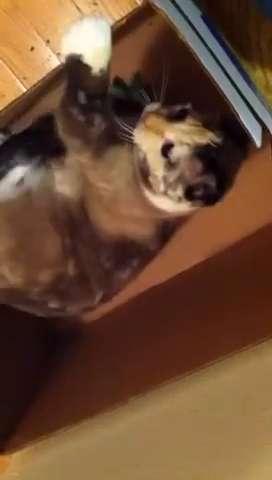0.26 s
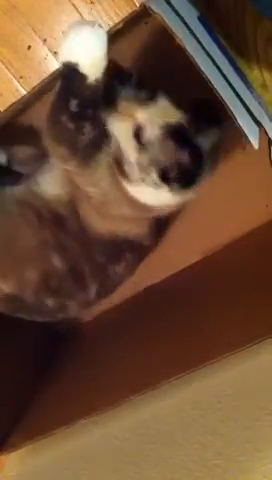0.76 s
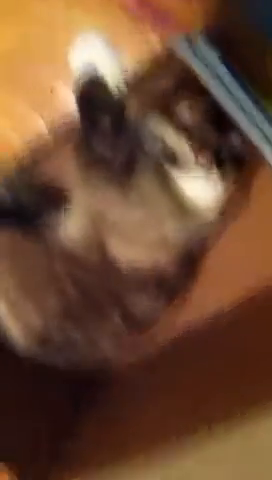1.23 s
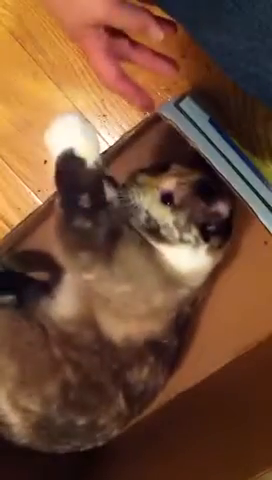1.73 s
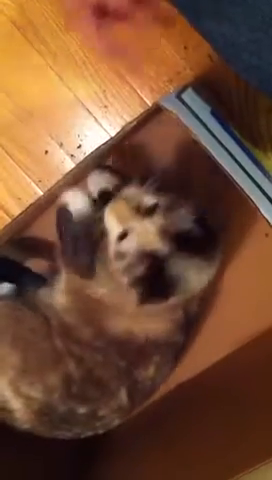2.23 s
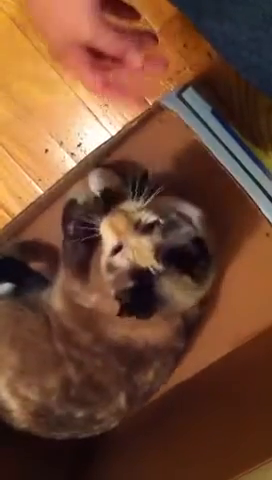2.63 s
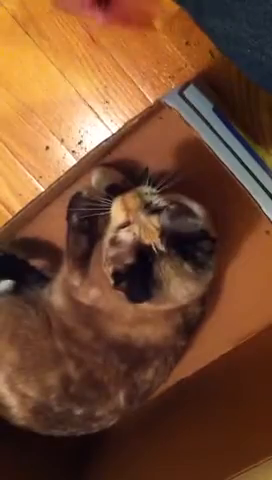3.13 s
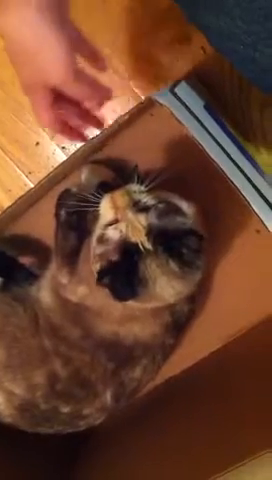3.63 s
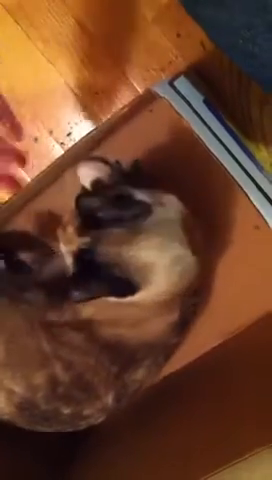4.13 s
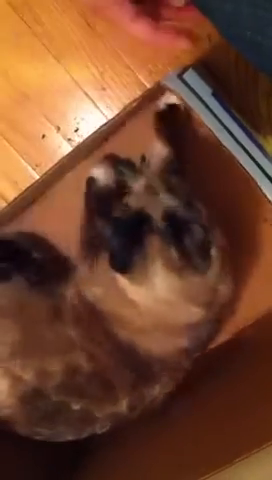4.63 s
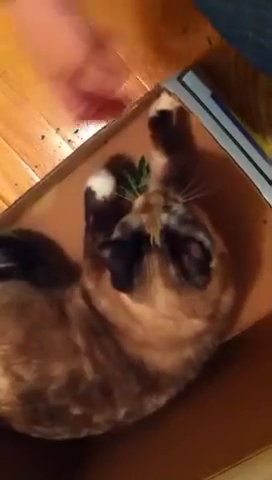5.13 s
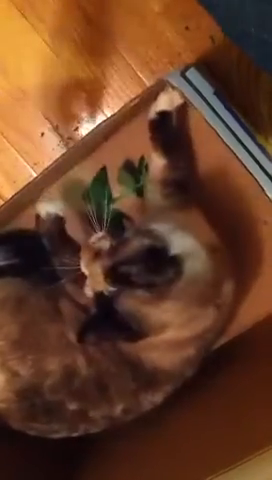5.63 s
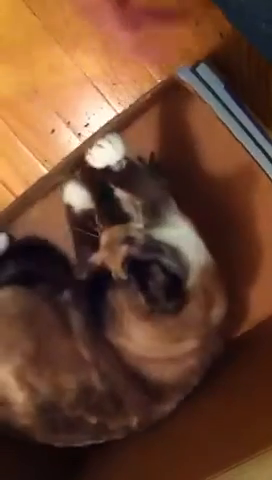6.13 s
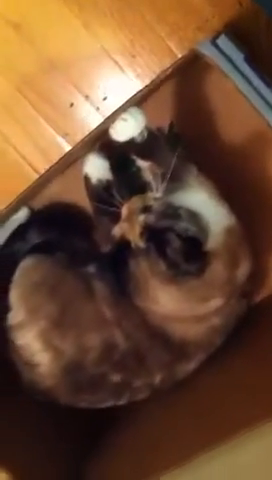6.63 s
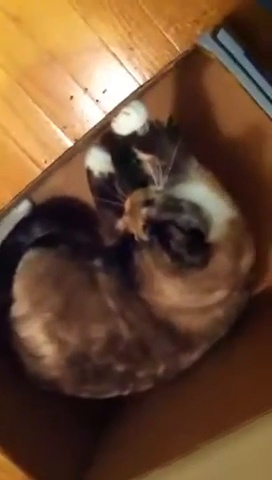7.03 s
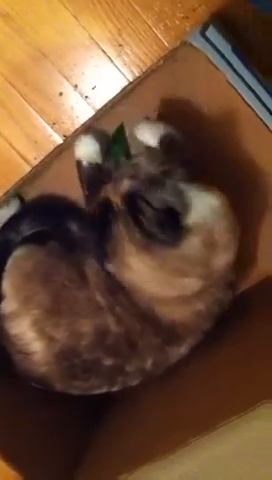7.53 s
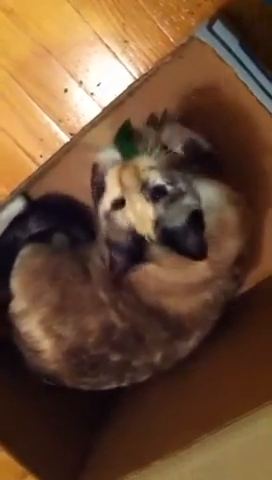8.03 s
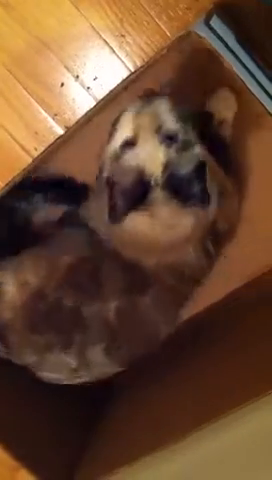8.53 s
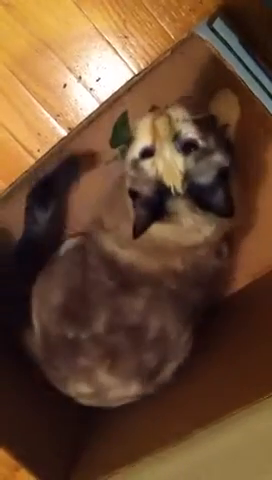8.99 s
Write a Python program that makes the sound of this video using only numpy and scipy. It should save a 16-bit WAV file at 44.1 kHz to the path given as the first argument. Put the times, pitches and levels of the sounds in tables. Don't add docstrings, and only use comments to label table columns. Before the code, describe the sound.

Close to an open cardboard box in a quiet room, a cat's paws knock and scuff the board, with one deep, boomy thump early on. Scratchy dragging bursts follow as the body rolls, peaking in a loud, sharp crack and scrape. Afterwards only faint fur rustles and tiny claw ticks remain over low room tone and soft hiss.

```python
import sys
import numpy as np
from scipy import signal
from scipy.io import wavfile
from scipy.ndimage import uniform_filter1d

SR = 44100
rng = np.random.default_rng(int(sys.argv[2]) if len(sys.argv) > 2 else 0)


def log_audio(samples):
    frames = np.atleast_2d(samples).T
    limited = np.clip(frames, -1, 1)
    pcm = np.round(limited * 32767).astype(np.int16)
    wavfile.write(sys.argv[1], SR, pcm)


def level_to_linear(level):
    exponent = np.asarray(level, float) / 20
    return 10 ** exponent


N = 408366


def rms_one(x):
    return x / np.sqrt(np.mean(x ** 2) + 1e-20)


def drift(rate):
    r = np.exp(-80 * np.pi * rate / SR)
    noise = rng.standard_normal(N // 40 + 2002)
    slow = signal.lfilter([1], [1, -2 * r, r * r], noise)[2000:]
    return np.interp(np.arange(N) / 40, np.arange(len(slow)), rms_one(slow))


# [pitch_hz, level_db per Hz]
RUMBLE = [(20, -15.5), (60, -43), (85, -12), (115, -15.5), (155, 3), (200, -7), (310, -9), (500, -12),
          (650, -17.5)]
# [pitch_hz, level_db per Hz]
HISS = [(1000, -20), (2500, -23), (4000, -25), (5000, -30), (6500, -28), (10000, -38), (13000, -45),
        (15500, -54)]
# [pitch_hz, level_db rms]
WHINE = [(14998, -96)]
FLOOR_DB = -63


def room_tone():
    out = 0
    edges = 20 * 2 ** (np.arange(30) / 3)
    white = rng.standard_normal((2, N))
    hz, db = np.transpose(RUMBLE + HISS)
    for k, (low, high) in enumerate(zip(edges, edges[1:])):
        third = signal.butter(3, [low, high], "band", fs=SR, output="sos")
        band = signal.sosfilt(third, white[k % 2])
        level_db = np.interp(np.log(low * high) / 2, np.log(hz), db)
        out = out + level_to_linear(level_db + .8 * drift(3)) * band
    whine = sum(level_to_linear(db + 3) * np.sin(2 * np.pi * hz * np.arange(N) / SR) for hz, db in WHINE)
    return level_to_linear(FLOOR_DB) * rms_one(out) + whine


def resonance(x, hz, width):
    r = np.exp(-np.pi * width / SR)
    top = np.array([1, 0, -1]) * (1 - r * r) / 2
    return signal.lfilter(top, [1, -2 * r * np.cos(2 * np.pi * hz / SR), r * r], x + 1e-18)


def as_bands(modes):
    return [(hz, np.log(1000) / np.pi / t60, db) for hz, db, t60 in modes]


# [pitch_hz, level_db, t60_s]
BOOM = [(154.2, -1, 0.38), (186.7, -9, 0.12)]
# [pitch_hz, level_db, t60_s]
PANELS = [(243.5, -7.5, 0.033), (304, -1.5, 0.068), (316, -4.5, 0.058), (358, -9.5, 0.052), (411.8, 6, 0.2),
          (467.6, -2.5, 0.17), (495, -20, 0.55), (591, -8, 0.032)]
# [pitch_hz, width_hz, level_db]
FACE = [(830, 160, -3), (892, 47, -3), (1079, 166, 1.5), (1226, 60, 2), (1328, 63, -2), (1510, 236, -8.5),
        (1667, 107, -1)]
# [pitch_hz, width_hz, level_db]
RIDGES = [(2017, 270, 1), (2304, 160, 0), (2588, 180, -3), (2987, 326, -1.5), (3300, 200, -6.5),
          (3630, 200, -2.5), (3860, 430, -8.5), (4260, 360, -11)]
# [pitch_hz, width_hz, level_db]
FIZZ = [(5136, 1770, 10), (5900, 600, -12), (6380, 1100, 15.5), (7800, 1020, 11.5), (8435, 1100, -2.5),
        (11300, 2100, -6), (12870, 1200, -13), (13630, 1200, -23.5)]
BODIES = (as_bands(BOOM), as_bands(PANELS), FACE, RIDGES, FIZZ)


def rubbed(body, force, patchy_db):
    ring = sum(level_to_linear(db + patchy_db * drift(10.0)) * resonance(force * rng.choice([-1, 1], N), hz, width)
               for hz, width, db in body)
    reach = [.85 * body[0][0], 1.07 * body[-1][0]]
    return rms_one(signal.sosfilt(signal.butter(4, reach, "band", fs=SR, output="sos"), ring))


def slips(per_s, spread_db, clump_db):
    born = rng.random(N) < per_s / SR
    sizes = level_to_linear(spread_db * np.minimum(rng.exponential(1, N), 3.0)) * rng.choice([-1, 1], N)
    return born * sizes * level_to_linear(clump_db * (drift(32) + 0.36 * drift(140)))


STREAKS_DB, STREAK_WIDTH_HZ, STREAK_PATCHY_DB = -12, 18.3, 8


def streaks(force):
    out = 0
    for hz in np.geomspace(800, 4200, num=14) * rng.uniform(.95, 1.05, size=14):
        level_db = STREAK_PATCHY_DB * drift(6.9) - 8.1 * np.log2(hz / 1000)
        out = out + level_to_linear(level_db) * resonance(force, hz, STREAK_WIDTH_HZ * np.sqrt(hz / 1000))
    return rms_one(out)


# [peak_s, extra_db, length_ms]
CATCHES = [(3.67, 2, 34), (3.756, 4, 72), (3.898, 7, 63), (3.934, 8, 33), (4.012, 10, 37), (4.09, 8, 43),
           (4.143, 7.5, 39), (4.21, 10, 26), (4.26, 10.5, 56), (4.309, 8.5, 65), (4.354, 2.5, 31),
           (4.413, 8, 40), (4.605, 8.5, 11), (4.631, 4, 69), (4.699, 1, 21), (5.097, 5, 93), (5.189, 1, 27),
           (5.326, -2.5, 41), (5.397, 3.5, 72), (5.447, 1.5, 28), (5.78, 3, 26), (5.752, 5.5, 25),
           (5.878, 10.5, 33), (5.918, 4.5, 19), (5.965, 2, 53), (6.07, 0.5, 28), (6.103, 5.5, 28)]


def catching():
    extra_db, t = np.zeros(N), np.arange(N) / SR
    for s, bump_db, length_ms in CATCHES:
        near = slice(round((s - .15) * SR), round((s + .15) * SR))
        extra_db[near] += bump_db * np.exp(-((t[near] - s) * 3500 / length_ms) ** 2)
    return level_to_linear(extra_db)


def strokes(rows):
    out = np.zeros((4, N))
    for start, end, rise_s, fall_s, *parts_db in rows:
        rise_s, fall_s = max(rise_s, .002), max(fall_s, .002)
        first = max(round((start - 2.5 * rise_s) * SR), 0)
        last = min(round((end + 2.5 * fall_s) * SR), N)
        near = np.arange(first, last)
        rise, fall = (near / SR - start) / rise_s, (end - near / SR) / fall_s
        shape = level_to_linear(20 * np.minimum(np.minimum(rise, fall), 0))
        out[:, near] += np.outer(level_to_linear(np.array(parts_db)), shape)
    return out


FIZZ_UNDER_DB, FIZZ_FOLLOWS = -12, 0.89


def pressed(face_db, panel_db, ridge_db):
    return face_db + np.array([panel_db, 0, ridge_db, FIZZ_UNDER_DB + FIZZ_FOLLOWS * ridge_db])


# [start_s, end_s, face_db, panels_over_face_db, ridges_over_face_db]
DRAGS = [(3.661, 3.752, -54, 8.5, -3), (3.773, 3.975, -44.5, 1, -7), (4.058, 4.164, -56, 4.5, -2),
         (4.199, 4.445, -43, -1.5, -6.5), (4.5, 4.693, -50, -5.5, -5), (5.097, 5.13, -66.5, 4, 6),
         (5.15, 5.194, -51.5, 0.5, -4), (5.296, 5.432, -47, -1, -7.5), (5.533, 5.567, -53, 2, -10.5),
         (5.712, 5.746, -47, -6, -9.5), (5.781, 5.824, -39, -14, -3), (5.878, 5.98, -36, -1.5, -3),
         (6.068, 6.092, -39.5, -2, 0), (5.988, 6.048, -43, -13.5, -9), (6.142, 6.213, -59, -10.5, -10)]
# [start_s, face_db, fall_s (20 dB), panels_over_face_db, ridges_over_face_db]
SCUFFS = [(0.822, -43, 0.05, 4, -5.5), (0.912, -47.5, -0.12, 5, -6), (0.943, -45, -0.07, -1, -13),
          (1.134, -56, 0.1, -9, -28), (1.241, -44, -0.03, 7, -20), (1.523, -54.5, 0.12, -15, -21),
          (1.759, -54, 0.16, 5, -5.5), (1.84, -36, 0.04, 7, -12), (2.042, -27.5, 0.0183, 8, -13),
          (2.07, -56, 0.25, 0, -9), (2.425, -38, 0.0166, -11, -1.5), (2.556, -42, 0.06, 1, -2),
          (3.314, -43.5, .04, 2.5, -19), (3.385, -52, 0.1, 3, -8), (3.44, -51, 0.1, 7, -6),
          (3.514, -51, .03, 7, -15.5), (3.578, -53.5, 0.1, 6, -2), (4.461, -24.5, 0.0378, -11.5, -8),
          (4.858, -61, -0.03, 6, -2), (5.81, -34.5, 0.0353, -4.5, -0.5), (5.841, -20.5, 0.0177, -7, -8),
          (0.592, -47, .07, 4, -5), (1.594, -42, .04, -6, -1)]
# [peak_s, face_db, swell_s (20 dB), panels_over_face_db, ridges_over_face_db]
PRESSES = [(1.36, -71, -0.3, -7, -3), (1.463, -59, 0.13, 6.5, -3), (1.75, -70, -0.26, 14, -4),
           (2.032, -47.5, 0.0939, 4.5, -9.5), (2.28, -69, 0.1, 0, -4), (2.72, -65.5, 0.2, -1, -18),
           (2.89, -64, .12, -25, -22), (4.99, -63, 0.27, 2.5, -19), (6.4, -68, -0.74, -9, -2),
           (5.69, -46.5, 0.03, -9, -12), (0.99, -59.5, 0.1, 14, -18), (2.472, -43.5, 0.02, -7, -5),
           (2.6, -45, 0.0455, -9, -1), (1.79, -59.5, .04, 0, -8), (2.11, -59, 0.13, 6, -14),
           (0.637, -50, .035, 3, -8), (1.615, -45, .045, -8, 0), (3.405, -47, .03, 0, -6),
           (3.465, -50, .025, 4, -4)]
# [start_s, end_s, face_db,
# ridges_over_face_db, fizz_over_face_db]
BRUSHES = [(0.925, 0.951, -50.5, 0.5, 1.5), (1.98, 2.037, -89, -7, 17), (3.136, 3.16, -78, 13.5, 5),
           (5.058, 5.103, -80, 13, 18.5), (5.122, 5.19, -64.5, -1, 4.5), (5.276, 5.36, -65, 7.5, 8),
           (6.896, 6.933, -65.5, -3, -6), (7.334, 7.46, -78, 13, 7.5), (7.496, 7.571, -73, 8, 11.5),
           (7.878, 7.919, -69.5, -3.5, -11), (8.03, 8.062, -77, 4.5, -10.5), (8.09, 8.099, -68, 1.5, 7),
           (8.245, 8.311, -82, 5, 7), (8.389, 8.405, -70.5, -14, -2), (8.559, 8.597, -83.5, 9.5, 15),
           (8.668, 8.674, -63.5, 8, 8), (8.8, 8.805, -71, 4, -2), (8.834, 8.93, -68.5, -3, -5),
           (9.084, 9.128, -83, -10, 8), (9.132, 9.185, -75, 2.5, -1), (9.184, 9.248, -76, -1, -5)]
DRAG_RISE_S, DRAG_FALL_S = 0.074, 0.049
BRUSH_RISE_S, BRUSH_FALL_S = 0.1, 0.027
SCUFF_RISE_S = .003
BOOM_UNDER_DB, WEIGHT_S = -12, 0.081
PANELS_CATCH = 0.81


def rubbing():
    force = slips(per_s=6000, spread_db=3.5, clump_db=2.0)
    drags = strokes([(a, b, DRAG_RISE_S, DRAG_FALL_S, *pressed(*db)) for a, b, *db in DRAGS])
    scuffs = [(s, s, SCUFF_RISE_S, fall_s, *pressed(db, *over)) for s, db, fall_s, *over in SCUFFS]
    presses = [(s, s, swell_s, swell_s, *pressed(db, *over)) for s, db, swell_s, *over in PRESSES]
    brushes = [(a, b, BRUSH_RISE_S, BRUSH_FALL_S, db - 4, db, db + ridge_db, db + fizz_db)
               for a, b, db, ridge_db, fizz_db in BRUSHES]
    light = strokes(scuffs + presses + brushes)
    weight = level_to_linear(BOOM_UNDER_DB) * uniform_filter1d(drags[0] + 0.72 * light[0], round(WEIGHT_S * SR))
    caught = drags * catching() ** np.array([[PANELS_CATCH], [1], [1], [1]])
    levels = np.vstack([weight, caught + light])
    patchy_db = (1.5, 2, 3, 3.5, 4.5)
    trim_db = (1.5, -5.0, -6.5, -3.0, -7.5)
    body_sound = sum(gain * level_to_linear(trim) * rubbed(body, force, patchy)
                     for gain, trim, body, patchy in zip(levels, trim_db, BODIES, patchy_db))
    fine = level_to_linear(STREAKS_DB) * levels[2] * streaks(force)
    fur_top = signal.butter(8, 14200, fs=SR, output="sos")
    return signal.sosfilt(fur_top, body_sound + fine)


# [start_s, peak_db, pitch_hz at first, decay_ms]
DENTS = [(0.593, -29.5, 352, 3.5), (0.938, -20, 361, 7.5), (1.24, -42.5, 302, 3.1), (1.259, -47, 234, 7.6),
         (1.297, -39, 253, 5.6), (1.328, -53, 180, 5), (1.522, -35.5, 262, 2.7), (1.757, -43, 231, 5.3),
         (1.839, -39, 355, 4.4), (1.851, -48, 380, 8.2), (2.423, -39, 254, 3.5), (2.556, -32.5, 305, 4.3),
         (3.314, -27.5, 291, 3.8), (3.512, -50, 220, 4.4), (6.312, -39.5, 405, 0.63)]
DENT_SAG, DENT_SAG_S, DENT_RISE_S = 0.478, 0.01, 0.00052


def dents():
    out, t = np.zeros(N + SR), np.arange(SR // 10) / SR
    turns = (1 - DENT_SAG) * t + DENT_SAG * DENT_SAG_S * (1 - np.exp(-t / DENT_SAG_S))
    for s, db, hz, decay_ms in DENTS:
        swell = (1 - np.exp(-t / DENT_RISE_S)) * np.exp(-1000 * t / max(decay_ms, 1))
        tap = swell * np.sin(-2 * np.pi * hz * turns)
        out[round(s * SR):][:len(t)] += level_to_linear(db) * tap / np.abs(tap).max()
    return out[:N]


def strike(force, body, level_db, lean_db=0):
    luck_db = rng.normal(0, 1.8, len(body)) + lean_db
    ring = sum((-1) ** k * level_to_linear(db + luck_db[k]) * np.sqrt(width) * resonance(force, hz, width)
               for k, (hz, width, db) in enumerate(body))
    return level_to_linear(level_db) * ring / np.abs(ring).max()


def contact(t, contact_ms, top_hz):
    crackle = rng.standard_normal(len(t)) * np.exp(-1000 * t / max(contact_ms, .1))
    crackle[0] = 4.5
    return signal.sosfilt(signal.butter(2, top_hz, fs=SR, output="sos"), crackle)


# [start_s, face_db peak, boom_db, panels_db, fizz_db]
KNOCKS = [(0.594, -45, -50, -43, -40), (0.818, -55, -49, -56, -34.5), (0.905, -40, -31, -33, -18.5),
          (0.938, -34, -54, -32, -26), (1.239, -65, -64, -58, -66), (1.293, -73, -62, -58, -78),
          (1.521, -47, -56, -45.5, -73), (1.755, -44.5, -64, -61, -71), (1.835, -51, -47.5, -45, -54),
          (1.969, -73, -48, -53, -70), (2.04, -38, -35, -54, -37), (2.421, -38.5, -57.5, -51, -32),
          (2.554, -41, -67, -53, -67), (3.312, -47.5, -51, -39, -69), (3.514, -71, -50.5, -46, -74),
          (4.459, -24, -48, -56, -16), (4.473, -26.5, -46.5, -74, -41), (5.839, -9, -45.5, -29.5, -10),
          (6.308, -56, -72.5, -51, -72)]
# [start_s, face_db peak, brightest_hz, fizz_db,
# contact_ms]
SNAGS = [(0.722, -48, 2300, -44, 1), (1.128, -55, 910, -79, 0.66), (1.251, -55, 816, -59, 0.52),
         (1.313, -55, 1500, -54, .5), (1.353, -54, 1460, -50, 0.42), (4.792, -52, 1120, -80, 0.31),
         (4.857, -48, 2030, -83, 1), (4.986, -55.5, 2110, -78, 0.8), (7.529, -51, 2900, -56, 0.87),
         (1.153, -58, 1500, -75, .6), (1.188, -60, 2500, -70, .5), (1.255, -56, 1500, -62, .5),
         (9.033, -66, 4000, -68, .8), (8.012, -53, 1200, -54, 0.89), (8.382, -50, 2260, -46, 0.68),
         (8.791, -58, 2270, -55, 0.93),
         (0.938, -45, 3000, -46, 1.8), (1.24, -53, 1200, -68, 1), (1.838, -44, 1150, -61, 1.2),
         (2.041, -33.5, 1150, -46, 1.4), (2.042, -36, 3700, -49, 1.2), (2.4, -58, 3700, -75, 3),
         (0.603, -44, 3000, -52, 2.3), (5.84, -29.5, 2990, -26, 0.54), (3.313, -43, 1200, -63, 1.1),
         (3.741, -47, 3100, -69, 0.91), (3.897, -45, 1340, -60, 1.5), (4.207, -55, 1500, -57, 2.4),
         (4.257, -51, 1300, -52, 1.8), (4.401, -42, 1500, -63, 1.5), (4.46, -31, 2200, -39, 1.5),
         (5.319, -41, 2060, -60, 1), (5.694, -50, 1800, -62, 1.5), (5.703, -41.5, 1250, -75, 2),
         (5.751, -42, 2000, -64.5, 0.9), (5.852, -23.5, 1100, -49.5, 1.5), (5.871, -33.5, 2860, -48.5, 1.5),
         (5.954, -32, 2500, -52, 1.6), (6.105, -37, 3300, -49, 1.5)]
PAD_CONTACT_MS = 2.24


def knocks():
    out, t = np.zeros(N + SR), np.arange(SR // 2) / SR
    push = t * np.exp(-t / 0.0047)
    sheet = FACE + RIDGES
    octaves = np.log2(np.array(sheet)[:, 0] / 1000)
    panel_lean_db = -7.0 * np.log2(np.array(PANELS)[:, 0] / 300)
    for s, face_db, boom_db, panel_db, fizz_db in KNOCKS:
        crack = contact(t, PAD_CONTACT_MS, top_hz=7400)
        here = out[round(s * SR):][:len(t)]
        here += strike(push, BODIES[0], boom_db + 5.5, np.array([0, -5.0]))
        here += strike(push + .00008 * crack, BODIES[1], panel_db + 4.0, panel_lean_db)
        here += strike(crack, sheet, face_db + .5, 1.2 * octaves)
        here += strike(crack, FIZZ, fizz_db - 12.0)
    for s, face_db, bright_hz, fizz_db, contact_ms in SNAGS:
        crack = contact(t, contact_ms, top_hz=9500)
        lean_db = -10.5 * np.abs(octaves - np.log2(bright_hz / 1000))
        here = out[round(s * SR):][:len(t)]
        here += strike(crack, sheet, face_db + 6.0, lean_db)
        here += strike(crack, FIZZ, fizz_db + 6.0)
        tick = np.gradient(crack)
        here += level_to_linear(min(face_db - 4, fizz_db + 4)) * tick / np.abs(tick).max()
    return out[:N]


# [start_s, length_s, pitch_hz, level_db rms]
PANEL_SPOTS = [(3.67, 0.036, 377, -58), (3.742, 0.024, 368, -41.5), (3.77, 0.051, 367, -43),
               (3.81, 0.013, 324, -51), (3.84, 0.035, 418, -46.5), (3.93, 0.035, 409, -42),
               (3.97, 0.035, 416, -44), (4.178, 0.029, 397, -38.5), (4.2, 0.014, 410, -49),
               (4.245, 0.039, 408, -43), (4.3, 0.016, 382, -40), (4.33, 0.018, 294, -42.5),
               (5.165, 0.055, 356, -52), (5.21, 0.044, 393, -52), (5.275, 0.02, 357, -51.5),
               (5.735, 0.019, 416, -44.5), (5.77, 0.044, 417, -43), (5.9, 0.02, 400, -38),
               (5.94, 0.02, 387, -52), (5.99, 0.042, 316, -54), (2.06, 0.019, 310, -41),
               (0.895, 0.021, 312, -35.5)]
# [start_s,
# length_s, pitch_hz, level_db rms]
SHEET_SPOTS = [(3.625, 0.067, 1080, -56.5), (3.74, 0.077, 2740, -54.5), (3.89, 0.02, 1310, -47),
               (3.92, 0.037, 1230, -64), (3.97, 0.048, 830, -54.5), (4.07, 0.033, 1140, -60),
               (4.235, 0.03, 850, -83), (4.25, 0.023, 1490, -52), (4.3, 0.082, 1020, -49),
               (4.35, 0.024, 1570, -50), (4.4, 0.026, 1070, -41.5), (4.4, 0.044, 2090, -52),
               (4.595, 0.062, 1264, -54.5), (5.08, 0.079, 2020, -69), (5.125, 0.058, 1084, -61),
               (5.3, 0.074, 2030, -58), (5.33, 0.13, 876, -57), (5.36, 0.063, 1290, -49),
               (5.43, 0.018, 1510, -53), (5.52, 0.028, 1390, -60), (5.68, 0.034, 1364, -51),
               (5.74, 0.018, 1300, -40), (5.772, 0.025, 1310, -45), (5.805, 0.0085, 3040, -34),
               (5.87, 0.013, 3060, -46), (5.905, 0.014, 3070, -39.5), (5.95, 0.028, 2160, -38),
               (5.955, 0.016, 3630, -38.5), (6.06, 0.038, 1116, -42.5), (6.06, 0.038, 2760, -41.5),
               (6.095, 0.015, 6550, -69),
               (1.142, 0.084, 1206, -69), (1.115, 0.051, 2100, -70), (1.587, 0.021, 3000, -52),
             (1.597, 0.032, 1170, -60), (1.758, 0.066, 1160, -66), (1.842, 0.02, 1100, -61),
             (1.846, 0.021, 1800, -56), (1.809, .025, 1150, -60), (2.013, 0.024, 1200, -54),
             (2.016, .02, 870, -58), (2.076, .02, 866, -48), (2.135, 0.024, 830, -60),
             (2.42, 0.015, 2000, -45.5), (2.424, 0.024, 880, -50), (2.466, 0.057, 900, -59),
             (2.556, 0.04, 1640, -47), (2.562, 0.028, 1090, -49.5), (2.613, 0.068, 943, -57.5),
             (3.39, 0.033, 1020, -52.5), (3.4, 0.013, 2800, -73), (3.446, 0.019, 1650, -64),
             (3.447, 0.022, 2800, -70), (3.51, 0.014, 1150, -59), (3.567, 0.05, 2210, -67),
             (6.86, 0.052, 1325, -67), (8.639, 0.037, 1910, -65), (8.648, 0.035, 5580, -64),
             (8.65, 0.032, 6800, -75), (8.773, 0.024, 3290, -66), (8.827, 0.031, 2900, -62),
             (8.826, 0.03, 1840, -67), (8.851, 0.098, 1310, -72), (8.885, 0.03, 2900, -70),
             (9.082, 0.022, 7200, -71), (9.118, 0.095, 3960, -69.5), (9.173, 0.095, 2900, -72)]
# [start_s, length_s, pitch_hz, level_db rms]
LATE_SPOTS = [
    (7.868, 0.058, 1225, -72.5),
    (8.012, 0.023, 1060, -69),
    (8.03, 0.073, 3690, -66),
    (8.069, .035, 4750, -75.5),
    (8.374, 0.017, 2240, -69),
    (8.38, 0.028, 3500, -87.5),
    (8.563, 0.066, 2400, -83),
    (8.99, .03, 3210, -73),
    (8.687, 0.055, 3630, -74),
    (9.115, 0.016, 3360, -66.5),
]
SPOT_SHARPNESS, PANEL_SHARPNESS, BRUSH_SHARPNESS = 13, 9, 4.5
SPOT_EDGE_S = .008
BRIGHT_HZ = 2500


def spots():
    out = np.zeros(N + SR)
    force = np.tile(slips(per_s=4500, spread_db=1.5, clump_db=1.0), 2)
    groups = ((PANEL_SPOTS, PANEL_SHARPNESS), (SHEET_SPOTS, SPOT_SHARPNESS),
              (LATE_SPOTS, BRUSH_SHARPNESS))
    for rows, sharpness in groups:
        for s, length_s, hz, db in rows:
            t = np.arange(round((max(length_s, .005) + .1) * SR)) / SR
            grip = np.clip(np.minimum(t, length_s + SPOT_EDGE_S - t) / SPOT_EDGE_S, 0, 1)
            width = hz / (sharpness if hz < BRIGHT_HZ else BRUSH_SHARPNESS)
            start = round((s - SPOT_EDGE_S / 2) * SR)
            ring = resonance(grip * force[start:][:len(t)], hz, width)
            ring = resonance(ring, hz, 2 * width)
            share = np.sqrt(max(length_s, .005) / t[-1])
            out[start:][:len(t)] += level_to_linear(db) * rms_one(ring) * share
    return out[:N]


# [start_s, peak_db, pitch_hz, t60_s]
RINGS = [
    (2.041, -22, 151, 0.41),
    (1.3, -51, 210, 0.45),
]
RING_RISE_S = 0.0079


def rings():
    out, t = np.zeros(N + SR), np.arange(SR // 2) / SR
    for s, db, hz, t60 in RINGS:
        swell = level_to_linear(db - 60 * t / t60) * (1 - np.exp(-t / RING_RISE_S))
        out[round(s * SR):][:len(t)] += swell * np.sin(2 * np.pi * hz * t)
    return out[:N]


ROOM_T60_S, ROOM_DB, WALL_CUT_HZ, ROOM_LOW_HZ = 0.37, -10.5, 13500, 230


def room(x):
    t = np.arange(int(.8 * SR)) / SR
    white = rng.standard_normal(len(t))
    dull = signal.sosfilt(signal.butter(1, WALL_CUT_HZ, fs=SR, output="sos"), white)
    slow, fast = level_to_linear(-60 * t / ROOM_T60_S), level_to_linear(-60 * t / (0.19 * ROOM_T60_S))
    tail = (dull * slow + (white - dull) * fast) * (t > .006)
    return level_to_linear(ROOM_DB) * signal.fftconvolve(x, tail / np.sqrt(np.sum(tail ** 2)))[:N]


def scene():
    contacts = rubbing() + knocks() + spots() + dents() + rings()
    box = signal.sosfilt(signal.butter(6, [112, 15200], "band", fs=SR, output="sos"), contacts)
    echoes = room(signal.sosfilt(signal.butter(2, ROOM_LOW_HZ, "high", fs=SR, output="sos"), box))
    return (box + echoes + room_tone())[None]


def top_cut(x):
    return signal.sosfilt(signal.butter(12, 15640, fs=SR, output="sos"), x)


def record(dry):
    cut = signal.sosfilt(signal.cheby2(12, 60, 16600, fs=SR, output="sos"), dry)
    return top_cut(cut)


dry = scene()
out = record(dry)
log_audio(out)
```